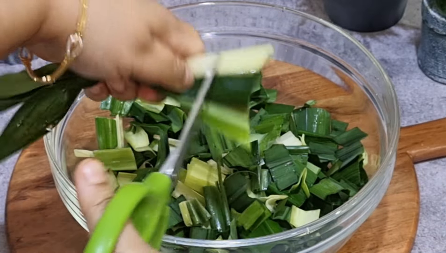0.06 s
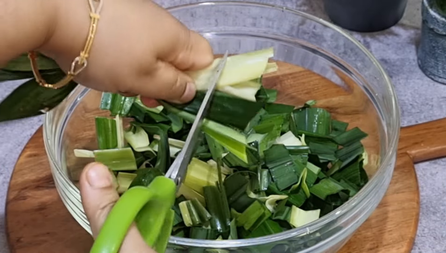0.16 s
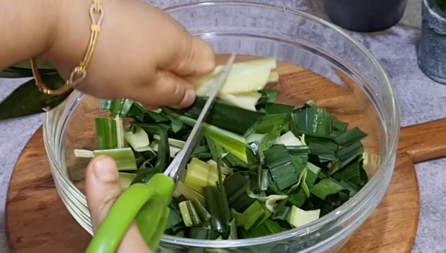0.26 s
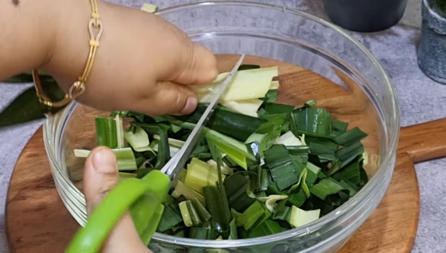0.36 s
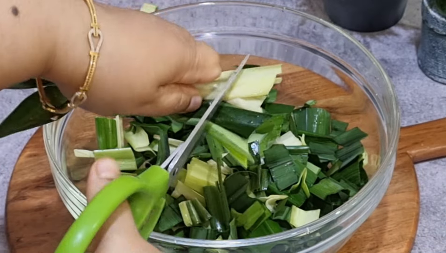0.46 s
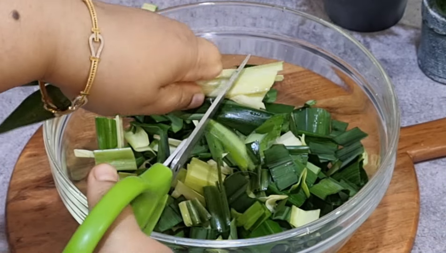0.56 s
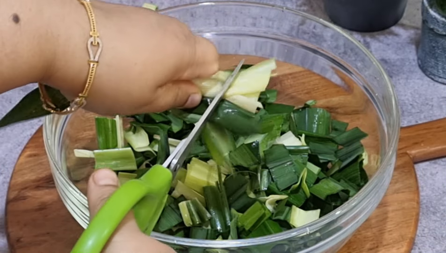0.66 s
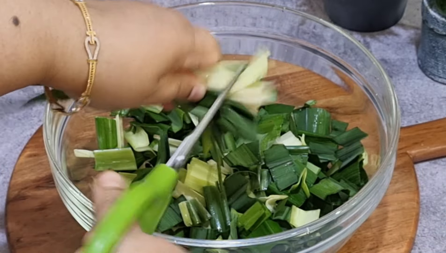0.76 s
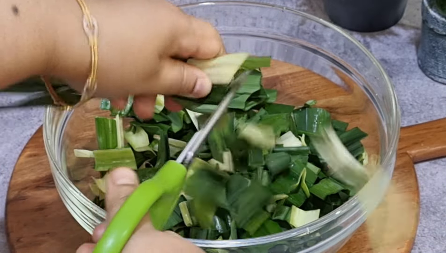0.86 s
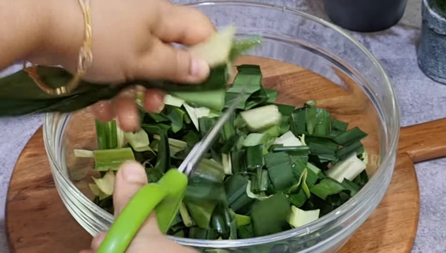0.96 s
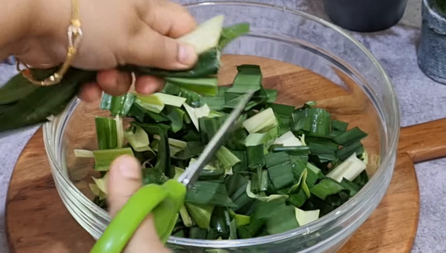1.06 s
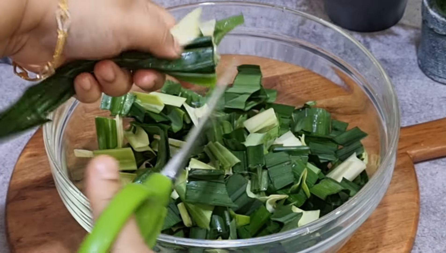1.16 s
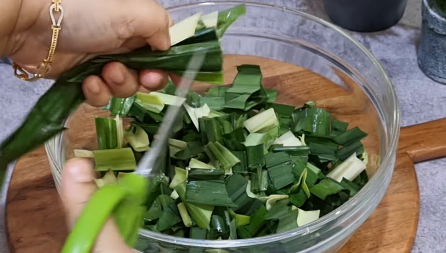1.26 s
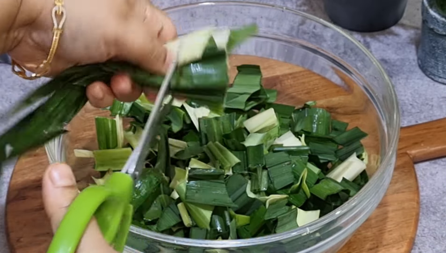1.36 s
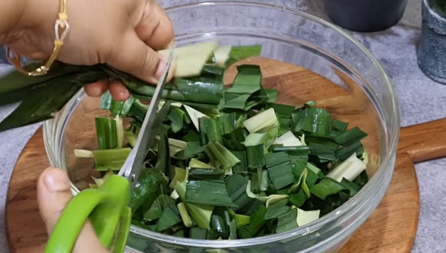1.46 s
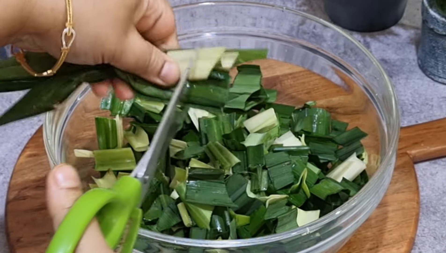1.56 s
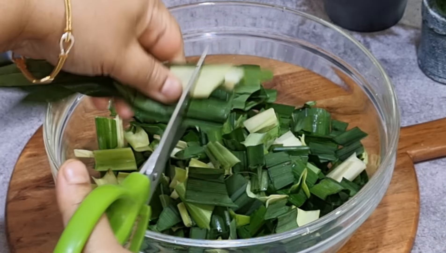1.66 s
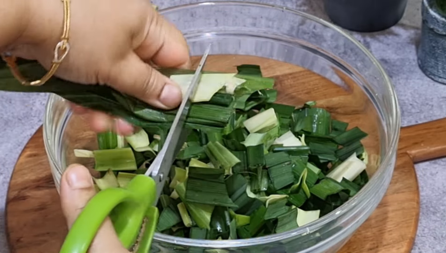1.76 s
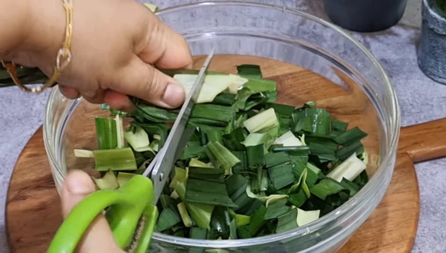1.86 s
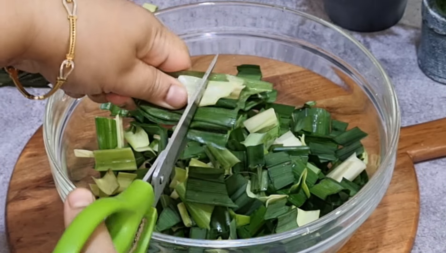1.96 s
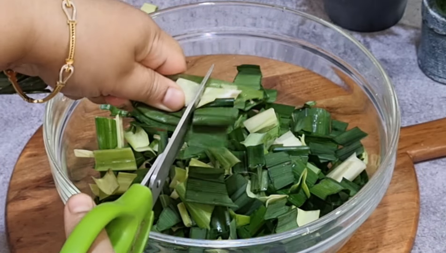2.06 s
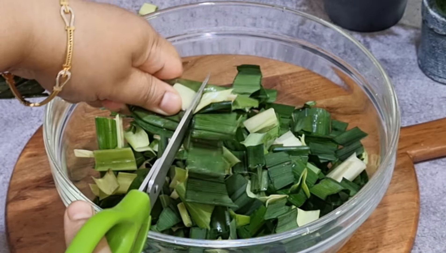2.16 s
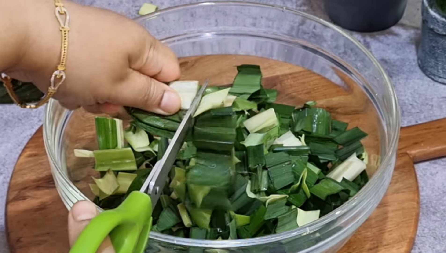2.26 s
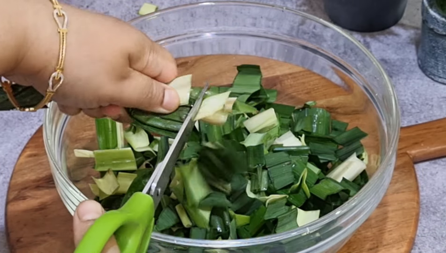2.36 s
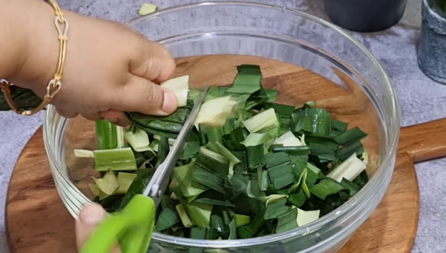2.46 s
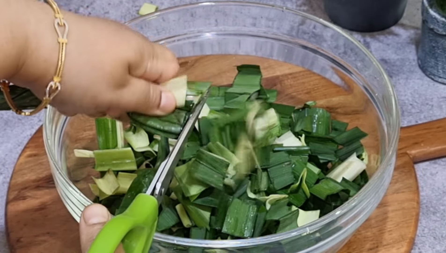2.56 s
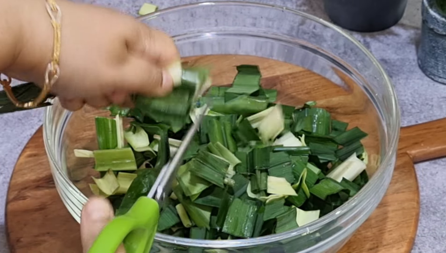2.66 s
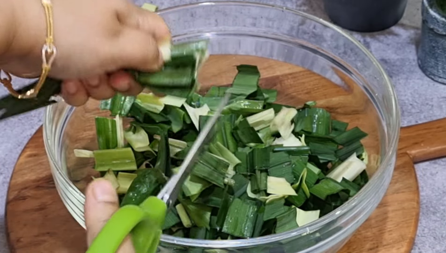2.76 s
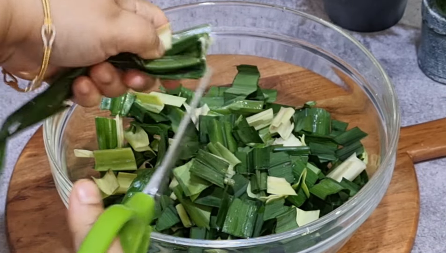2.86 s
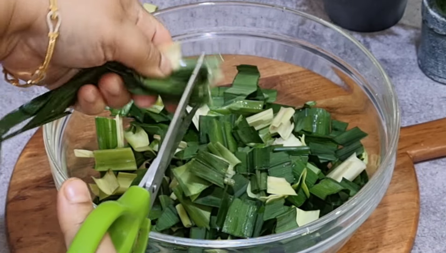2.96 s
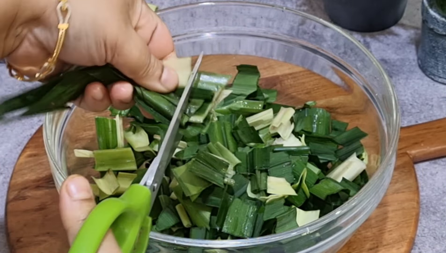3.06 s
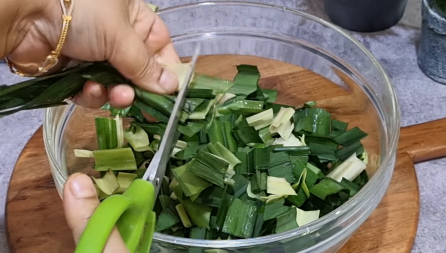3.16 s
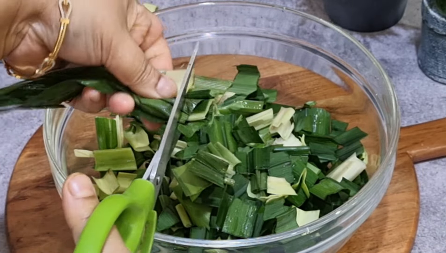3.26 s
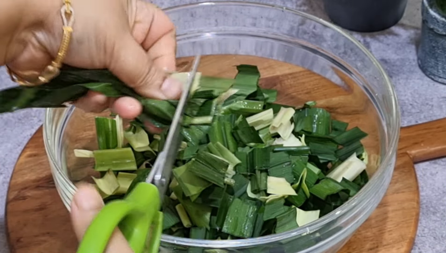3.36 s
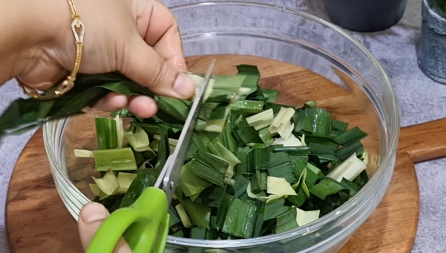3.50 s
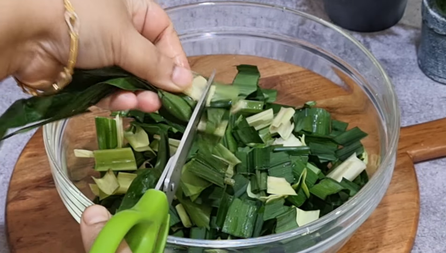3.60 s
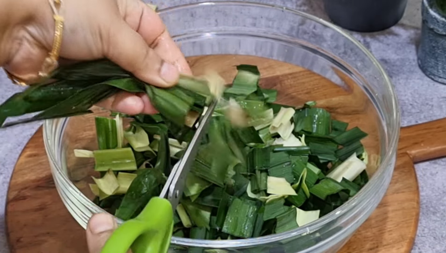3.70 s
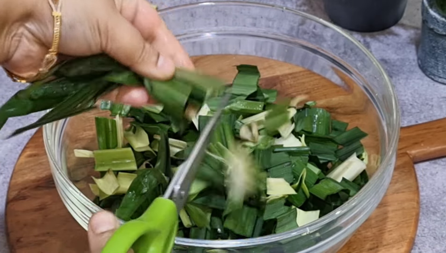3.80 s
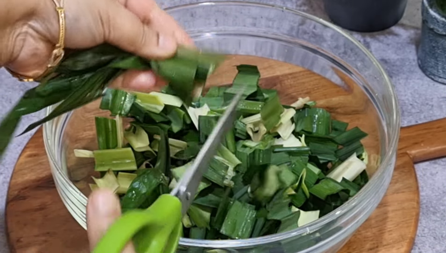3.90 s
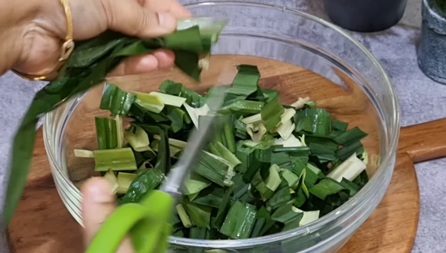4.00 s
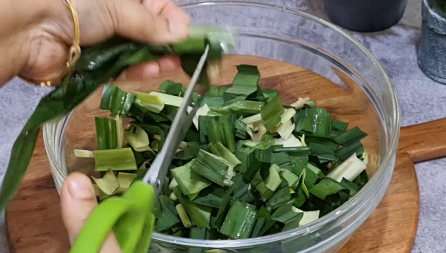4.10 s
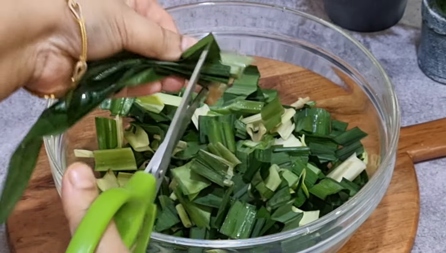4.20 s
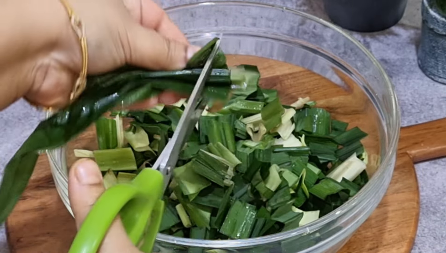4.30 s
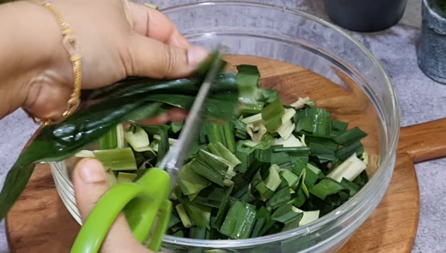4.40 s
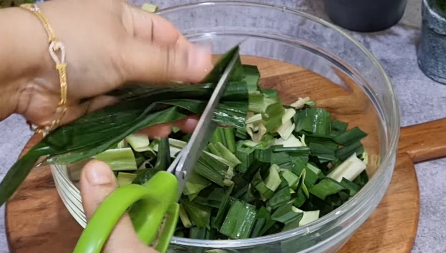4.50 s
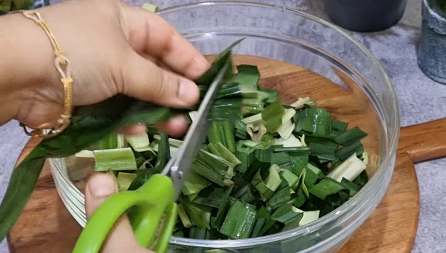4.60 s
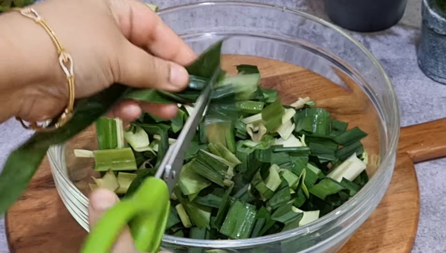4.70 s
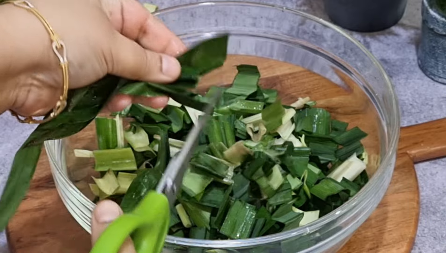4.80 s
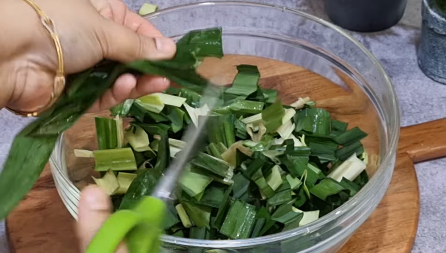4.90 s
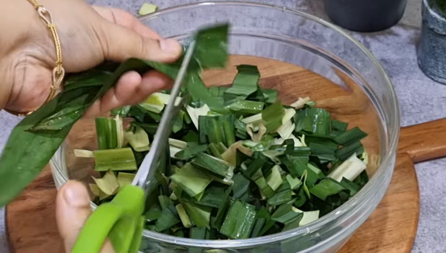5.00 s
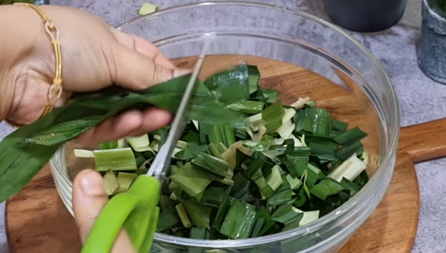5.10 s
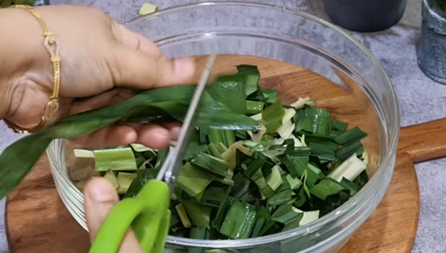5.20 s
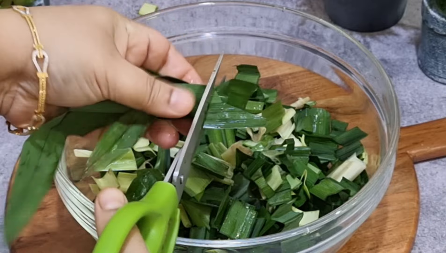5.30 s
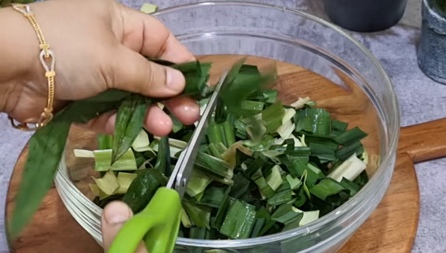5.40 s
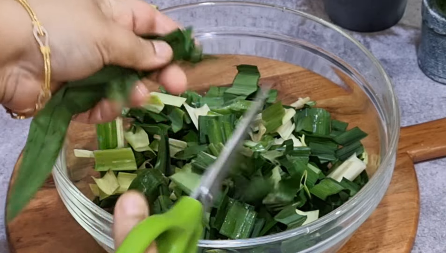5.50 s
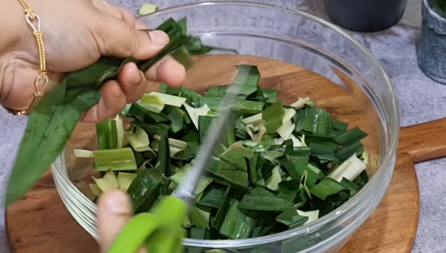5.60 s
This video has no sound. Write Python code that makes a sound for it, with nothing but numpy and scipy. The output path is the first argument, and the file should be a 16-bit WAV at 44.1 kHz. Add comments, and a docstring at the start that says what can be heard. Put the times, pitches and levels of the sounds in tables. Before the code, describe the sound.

Kitchen scissors crunch through a bunch of stiff leaves five times, close up, each cut ending in a sharp snap over low hum.

```python
"""Kitchen scissors cut a bunch of long stiff leaves over a glass bowl, five times, close to the microphone.
Trains of tiny fractures crunch, then rush as the last fibres tear; resonant noise bursts snap and tick.
Noise blows clack the steel blades shut and ring their decaying sine modes; the edges rub and the leaves rustle.
A small hard room answers in shifting noise echoes, and the level dips briefly after the last two cuts.
Behind it an appliance motor hums as a sum of sines, its phase jumping twice, over the soft noise of the room."""
import sys
import numpy as np
from scipy import signal
from scipy.fft import rfft, irfft, next_fast_len
from scipy.io import wavfile
from scipy.ndimage import uniform_filter1d

SR = 44100
rng = np.random.default_rng(int(sys.argv[2]) if len(sys.argv) > 2 else 0)


def output_pcm(signal):
    """Save a mono or channel-first signal as 16-bit PCM at the path in sys.argv[1].

    Samples are clipped to [-1, 1] before scaling.
    """
    pcm = np.clip(np.atleast_2d(signal).T, -1, 1) * 32767
    wavfile.write(sys.argv[1], SR, np.round(pcm).astype(np.int16))


N = 249165
TIME = np.arange(N) / SR

# The hand closes the blades in a few squeezes a cut. Each row: start in seconds, end in seconds,
# crunch level in relative dB, swell from start to end in dB.
SQUEEZES = [(0.562, 0.62, -49.5, 5), (0.622, 0.735, -43.5, 2.5), (0.773, 0.925, -36.5, 0),
            (1.98, 2.04, -57.5, 1.5), (2.04, 2.15, -42, 7), (2.198, 2.285, -38.5, -4),
            (2.3, 2.37, -45.5, -1.5), (2.42, 2.475, -50.5, 4.5), (2.578, 2.595, -42, -6),
            (3.512, 3.6, -44, 6), (3.638, 3.79, -42.5, 1.5), (4.665, 4.72, -60, 6),
            (4.727, 4.785, -45.5, 2.5), (5.445, 5.51, -42, -2)]
SQUEEZE_ATTACK_S, SQUEEZE_RELEASE_S = 0.011, 0.014


def amp(db):
    """Decibels to gain."""
    return 10 ** (np.asarray(db) / 20)


def unit(x):
    """Scaled to rms 1."""
    return x / np.sqrt(np.mean(x ** 2) + 1e-20)


def along(points, hz):
    """(Hz, value) points read on a log axis."""
    f, v = np.transpose(points)
    return np.interp(np.log(hz + 1), np.log(f + 1), v)


def filtered(x, response):
    """x times a response of frequency."""
    n = x.shape[-1]
    m = next_fast_len(n + n // 4)
    spectrum = rfft(x, m) * response(np.fft.rfftfreq(m, 1 / SR))
    return irfft(spectrum, m)[..., :n]


def resonance(x, hz, width_hz):
    """x through one resonance."""
    return filtered(x, lambda f: 1j * f * width_hz / (hz * hz - f * f + 1j * f * width_hz))


def convolved(x, response):
    """x rung through an impulse response, one row a channel."""
    return signal.fftconvolve(np.atleast_2d(x), np.atleast_2d(response), axes=1)[:, :N]


def click(spectrum, size=1024):
    """A causal click of energy 1 with the given spectrum, its phase folded from the cepstrum."""
    cepstrum = irfft(np.log(amp(along(spectrum, np.fft.rfftfreq(size, 1 / SR)))))
    cepstrum[1:size // 2] *= 2
    cepstrum[size // 2 + 1:] = 0
    pulse = irfft(np.exp(rfft(cepstrum)))
    return pulse / np.linalg.norm(pulse)


def add(track, s, sound):
    """Mix a sound in at time s."""
    part = track[..., round(s * SR):][..., :sound.shape[-1]]
    part += sound[..., :part.shape[-1]]


def strokes(rows, attack, release):
    """Gain over time of hand movements: each sets in, swells or eases while it lasts, and lets go."""
    gain = np.zeros(N)
    for start, end, db, swell_db in rows:
        swell = amp(db + swell_db * np.interp(TIME, [start, end], [-.5, .5]))
        onset = 1 - np.exp(-np.maximum(TIME - start, 0) / attack)
        letting_go = np.exp(-np.maximum(TIME - end, 0) / release)
        gain += swell * onset * letting_go
    return gain


def pair(spread, size):
    """Left and right noise that differ by the share spread."""
    common, apart = rng.standard_normal((2, size))
    spread = np.clip(spread, 0, 1)
    return np.sqrt(1 - spread) * common + np.sqrt(spread) * np.array([apart, -apart])


def crackle(rate, scatter_db, life, spread):
    """Stereo train of tiny fractures of uneven size, levelled to about rms 1 over 50 ms stretches."""
    sizes = (rng.random(N) < rate / SR) * amp(scatter_db * np.clip(rng.standard_normal(N), -2, 2))
    power = signal.lfilter([1], [1, -np.exp(-2 / (life * SR))], sizes ** 2)
    power /= np.abs(uniform_filter1d(power, size=2200)) + 1e-3 * power.mean()
    return np.sqrt(power) * pair(spread, size=N)


def hum():
    """An appliance motor drones in sines just under mains speed, over the soft noise of the room."""
    # Motor harmonics. Each row: frequency in Hz, level in relative dB.
    harmonics = [(59.35, -45.5), (118.7, -62), (178, -74.5), (231.5, -77), (296.6, -76.5)]
    # The phase of the hum jumps. Each row: time in seconds, jump in cycles of the lowest harmonic.
    phase_jumps = [(4.749, 0.456), (4.822, -0.16)]
    # Room air. Each row: frequency in Hz, density in relative dB per Hz.
    air_spectrum = [(20, -6), (45, 1), (90, -1), (140, -5.5), (220, -7), (330, -6.5), (480, -16.5),
                    (900, -20), (1500, -20.5), (2100, -28), (4000, -29), (7000, -26.5), (9000, -30.5),
                    (15500, -29.5)]
    # How alike the air is on the two sides. Each row: frequency in Hz, left-right likeness (1 is equal).
    air_alike = [(100, 0.94), (300, 0.76), (800, 0.59), (3000, 0.16)]
    jumped = sum(cycles * (1 + np.tanh((TIME - s) / 0.0057)) / 2 for s, cycles in phase_jumps)
    clock = TIME + jumped / harmonics[0][0]
    drone = sum(amp(db) * np.sqrt(2) * np.sin(2 * np.pi * (hz * clock + rng.random()))
                for hz, db in harmonics)

    def mid_side(f):
        turn = np.arccos(np.clip(along(air_alike, f), -1, 1)) / 2
        return amp(along(air_spectrum, f)) * [np.cos(turn), np.sin(turn)]

    mid, side = filtered(rng.standard_normal((2, N)), mid_side)
    air = unit(np.array([mid + side, mid - side]))
    # the drone leans left, the air a little too
    return amp(-2) * drone * amp([[1.4], [-1.5]]) + amp(-64.5) * air * amp([[1], [-1]])


def room(x, count=6):
    """Hard walls answer at once in decaying noise, different on each side; the pattern keeps changing."""
    # Decay of the room. Each row: frequency in Hz, unshaped 60 dB decay time in seconds.
    decay = [(200, 0.39), (1000, 0.56), (2500, 0.41), (5000, 0.43), (8000, 0.4), (12000, 0.37), (16000, .3)]
    wet = np.zeros((2, N))
    for k in range(count):
        hz, t, z = signal.stft(rng.standard_normal((2, SR * 3 // 5)), SR, nperseg=256)
        fading = z * amp(-60 * t / along(decay, hz)[:, None])
        tail = signal.istft(fading, SR, nperseg=256)[1]
        tail *= 1 - np.exp(-(np.arange(tail.shape[1]) / SR / 0.00067) ** 2)
        # 70 moments a second take turns among the echo patterns
        turn = np.arange(N) // (SR // 70) % count == k
        moments = x * np.abs(uniform_filter1d(turn * 1., size=64))
        wet += convolved(moments, tail / np.linalg.norm(tail[0]))
    wall_db = [(500, -5.0), (1700, -4.0), (2700, 1.0), (7000, -3.0), (10000, -1.5), (15000, -3.5)]
    return filtered(wet, lambda f: amp(along(wall_db, f)))


def rustle():
    """Leaves slide over each other in the hand, catching in a train of tiny clicks."""
    # The bunch is shifted in the hand. Each row: start in seconds, end in seconds,
    # rustle level in relative dB, swell from start to end in dB.
    shifts = [(0, 0.07, -64.5, -18), (0.222, 0.32, -61, -4), (0.455, 0.52, -60.5, -8),
              (1.08, 1.3, -60, -9.5), (1.4, 1.52, -67.5, 3), (1.625, 1.65, -67.5, -3),
              (1.775, 1.93, -62, -5), (3.122, 3.2, -58.5, 2), (3.305, 3.325, -62, 4.5),
              (3.405, 3.5, -68.5, 0), (4.38, 4.56, -73.5, 5), (5.165, 5.43, -62, -3.5),
              (5.525, 5.545, -42, -8)]
    # Colour of one catch. Each row: frequency in Hz, density in relative dB per Hz.
    leaf_spectrum = [(200, -21.5), (600, -1), (1500, -9), (2300, -7.5), (3600, -4.5), (4900, 1), (7700, -1),
                     (8800, -6.5), (11800, -4), (15500, -15.5)]
    catches = crackle(rate=1500, scatter_db=3.5, life=.001, spread=.4)
    movement = strokes(shifts, attack=0.0057, release=0.023)
    return amp(-2.5) * convolved(movement * catches, click(leaf_spectrum))


def rubs():
    """Edge slides on edge in tiny slips, with a thin, grainy hiss."""
    # The blades rub as they close and open. Each row: start in seconds, end in seconds,
    # level in relative dB, pitch in Hz, width in Hz.
    slides = [(2.318, 2.628, -50.5, 5600, 593), (2.62, 2.639, -27, 7200, 1800),
              (3.669, 3.79, -48, 7450, 2000), (4.019, 4.066, -57, 7200, 2500),
              (4.408, 4.552, -64.5, 6540, 2900), (5.62, 5.644, -47.5, 7500, 600)]
    track = np.zeros((2, N))
    slips = crackle(rate=620, scatter_db=2.0, life=0.0011, spread=0.45)
    for start, end, db, hz, width_hz in slides:
        stroke = np.clip(np.minimum(TIME - start, end - TIME) / 0.0019, 0, 1)
        track += amp(db) * stroke * unit(resonance(slips, hz, width_hz))
    return track


def blades(cutting):
    """The blades clack shut; the blow, and faintly the cutting, ring the modes of the steel."""
    # The blades clack shut, or click as they part. Each row: time in seconds, blow level in relative dB,
    # ring level in dB relative to the blow.
    contacts = [(0.926, -32.5, -1), (2.636, -9, -7), (2.638, -6, 9), (3.809, -26, -4),
                (4.0588, -40.5, -4.5), (4.833, -20, 7), (5.505, -24, -12)]
    # Modes of the blades. Each row: frequency in Hz, level in relative dB, 60 dB decay time in seconds.
    modes = [(2304, -15, .3), (4511, -6, .2), (4813, -3, .2), (5000, -5, .16), (5157, 0, .15),
             (5297, -1, .2), (6492, -11, .2), (7189, -6, .18), (7294, 1, .24), (7400, -5, .18),
             (7470, -4, .2), (7590, -6, .18), (7818, -4, .18), (10440, -14, .12), (11500, -13, .18)]
    # Colour of a blow. Each row: frequency in Hz, density in relative dB per Hz.
    blow_spectrum = [(150, -37), (500, -25), (1500, -14.5), (2500, -9), (3900, -18), (4500, 2.5), (5300, 4),
                     (6200, -5), (7000, -6), (7500, 8), (8100, -5), (8800, -18), (11800, -11.5),
                     (15500, -25.5)]
    blows, drive = np.zeros((2, N)), amp(-12.5) * cutting
    t = np.arange(SR // 100) / SR
    for s, db, ring_db in contacts:
        contact = unit(pair(spread=0.19, size=len(t)) * amp(-60 * t / 0.011))
        add(blows, s, amp(db - 14.0) * contact)
        add(drive, s, amp(db + ring_db + 0.5) * np.ones((2, 1)))
    t = np.arange(SR // 2) / SR
    ring = sum(amp(db - 60 * t / t60) * np.sin(2 * np.pi * (hz * t + rng.random((2, 1))))
               for hz, db, t60 in modes)
    ringing = convolved(drive, ring / np.linalg.norm(ring[0]))
    return convolved(blows, click(blow_spectrum)) + amp(-5.5) * ringing


def thin_ribs(count=260):
    """Thin ribs give way at uneven steps, as loud as the hand squeezes: rows (s, dB, Hz, t60 s)."""
    ribs_per_s, rib_db, scatter_db = 32, 8.5, 2.5
    rib_hz, scatter_octaves, rib_t60_s = 7000, 0.22, 0.0035
    steps, sizes, pitches = rng.standard_normal((count, 3)).T
    sizes = np.clip(sizes, -2, 2)
    times = (np.arange(count) + steps / 2) / ribs_per_s
    squeeze = strokes(SQUEEZES, SQUEEZE_ATTACK_S, SQUEEZE_RELEASE_S)
    pressure = np.interp(times, TIME, squeeze, right=0)
    return [(s, 20 * np.log10(p) + rib_db + scatter_db * size, rib_hz * 2 ** (scatter_octaves * pitch), rib_t60_s)
            for s, p, size, pitch in zip(times, pressure, sizes, pitches) if p > 1e-4]


def tick_runs():
    """The closing edge ticks over leaf after leaf, evenly and ever louder: rows (s, dB, Hz, t60 s)."""
    # Each row: start in seconds, end in seconds, first level in relative dB, last level in relative dB.
    runs = [(4.668, 4.743, -44, -24), (5.338, 5.412, -45, -35)]
    gap_s, tick_hz, tick_t60_s = 0.019, 9230, 0.0038
    ticks = []
    for start, end, first_db, last_db in runs:
        for s in np.linspace(start, end, round((end - start) / gap_s) + 1):
            db = np.interp(s, [start, end], [first_db, last_db])
            ticks.append((s, db, tick_hz, tick_t60_s))
    return ticks


def breaks():
    """Everything that snaps, cracks or ticks: rows (s, dB, Hz, t60 s)."""
    # A thick rib snaps, or a leaf ticks against the steel.
    # Each row: time in seconds, level in relative dB, pitch in Hz.
    thick_ribs = [(0.230, -45.5, 6260), (0.271, -36, 3450), (0.311, -43.5, 2940), (0.458, -38, 6300),
                  (0.575, -43.5, 5050), (0.628, -24, 7000), (0.776, -28, 5590), (1.170, -41, 7000),
                  (2.038, -34.5, 5530), (2.204, -25.5, 7500), (2.269, -25.5, 6000), (2.426, -28.5, 5530),
                  (2.549, -29, 5830), (2.583, -22.5, 6540), (2.878, -40, 6000), (3.164, -43, 6140),
                  (3.515, -38.5, 8940), (3.593, -28.5, 7600), (3.725, -30, 7700), (3.801, -22.5, 9030),
                  (4.056, -33, 7000), (4.765, -25.5, 9000), (5.023, -32.5, 7000), (5.454, -27, 9100),
                  (5.479, -27.5, 10500), (5.504, -25, 7600)]
    # A stalk at the core of the bunch cracks with a dull knock. Each row: time in seconds,
    # crack level in relative dB, pitch in Hz, decay time in seconds, knock level in relative dB.
    core_stalks = [(0.624, -34, 1300, .007, -54), (0.926, -16.5, 1750, .018, -40),
                   (2.635, -19, 2650, .01, -34), (3.811, -33, 1050, .012, -43),
                   (4.833, -27, 2700, .012, -46), (5.534, -21, 3400, .007, -55)]
    snap_t60_s = 0.005
    thick = [(s, db, hz, snap_t60_s) for s, db, hz in thick_ribs]
    # a thick rib gives way in two steps, the second later and softer
    splinters = [(s + 0.0045, db - 6, hz, snap_t60_s) for s, db, hz in thick_ribs]
    cracks = [row[:4] for row in core_stalks]
    knocks = [(s, db, 620, 0.007) for s, *_, db in core_stalks]
    return thick + splinters + cracks + knocks + tick_runs() + thin_ribs()


def snaps():
    """Each rib splits in a short burst at a pitch of its own, and the leaves around it shiver on."""
    track, t = np.zeros((2, N)), np.arange(SR // 25) / SR
    for s, db, hz, t60 in breaks():
        split = amp(-60 * np.maximum(t - .0009, 0) / t60)
        shiver = amp(-15) * amp(-60 * t / .018)
        fractures = np.tanh(2 * pair(spread=0.5, size=len(t)))  # fibres of one rib are about equally strong
        # the longer it rings, the purer it is
        burst = resonance(fractures * (split + shiver), hz, hz * 0.0031 / t60)
        add(track, s, amp(db - 19.5) * unit(burst))
    tone_db = [(7800, -0.5), (9500, -2), (11800, 5.0), (15500, -1.5)]
    return filtered(track, lambda f: amp(along(tone_db, f)))


def crunch():
    """Fibres break one by one under the blades, then in a rush as the bunch parts."""
    # Each cut ends as the last fibres tear together; the bunch lends it a hollow tone.
    # Each row: time in seconds, level in relative dB, rise and fall in seconds per 10 dB,
    # hollow pitch in Hz, width in Hz, hollow level in dB relative to the fibres.
    tears = [(0.926, -26, 0.0053, 0.019, 1540, 900, -5.5), (2.633, -26.5, 0.0085, 0.015, 2340, 762, -8),
             (3.805, -30.5, 0.0012, 0.034, 2850, 573, -20), (4.832, -26, 0.008, 0.019, 2730, 1586, -13.5),
             (5.481, -38, 0.024, 0.023, 11400, 1500, -3.5)]
    # Colour of one fracture. Each row: frequency in Hz, density in relative dB per Hz.
    fibre_spectrum = [(150, -38.5), (400, -18.5), (900, -17), (1400, -12.5), (2000, -12.5), (2700, -6.5),
                      (3800, -4.5), (5200, -1), (7800, 1), (8800, -5.5), (10200, -5.5), (11700, -4),
                      (13500, -6), (15500, -8.5)]
    track = np.zeros((2, N))
    slow = crackle(rate=1200, scatter_db=4.5, life=.0009, spread=.3)
    fast = crackle(rate=2200, scatter_db=3.5, life=.0008, spread=.35)
    previous = 0
    for s, db, rise, fall, hz, width_hz, hollow_db in tears:
        bite = [row for row in SQUEEZES if previous < row[0] < s]
        previous = s
        squeeze = strokes(bite, SQUEEZE_ATTACK_S, SQUEEZE_RELEASE_S)
        rush = amp(db - 10 * np.maximum((s - TIME) / rise, (TIME - s) / fall))
        fibres = squeeze * slow + rush * fast
        track += fibres + amp(hollow_db) * resonance(fibres, hz, width_hz)
    return convolved(track, click(fibre_spectrum))


def scene():
    """The scissors work close by, a little to the left, so their direct sound reaches that side first."""
    # The level of all but the hum and room air dips briefly. Each row: time in seconds, depth in dB,
    # time from onset to full recovery in seconds.
    dips = [(4.888, -6.5, 0.6), (5.512, -9, 1)]
    cutting = crunch() + snaps()
    near = cutting + blades(cutting) + rubs() + rustle()
    delay_s = np.array([[0], [3.5 / SR]])  # left, right
    direct = filtered(near, lambda f: np.exp(-2j * np.pi * f * delay_s))
    dip_db = sum(db * np.interp(TIME - s, [0, .003, recovery], [0, 1, 0]) for s, db, recovery in dips)
    return amp(dip_db) * (amp(-2.5) * direct + amp(-2.0) * room(near)) + hum()


def record(dry):
    """The two microphone ports differ most in the low middle; nothing is kept above the band limit."""
    top_hz = 15750
    # left-right difference: (Hz, dB)
    lean_db = [(250, 0.0), (700, 7.5), (1300, 3), (2400, 1.0), (4400, -2), (8000, 0.3)]
    return filtered(dry, lambda f: amp(along(lean_db, f) * np.array([[1], [-1]]) / 2) * (f < top_hz))


dry = scene()
out = record(dry)
output_pcm(out)
```